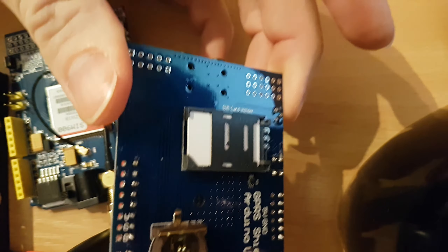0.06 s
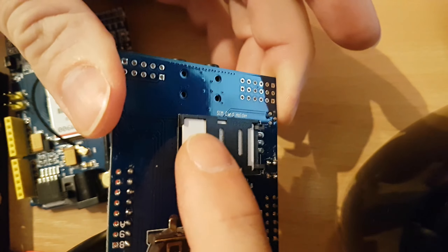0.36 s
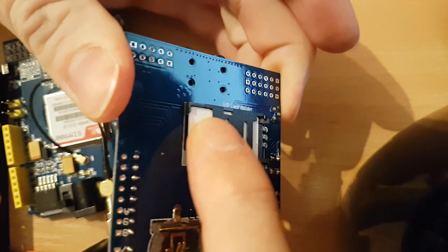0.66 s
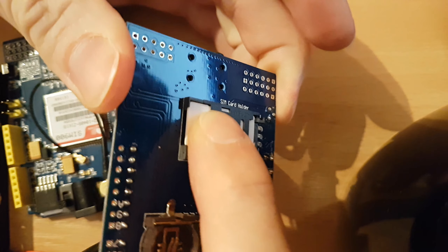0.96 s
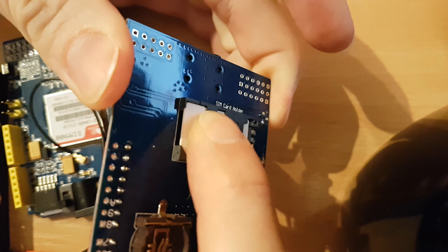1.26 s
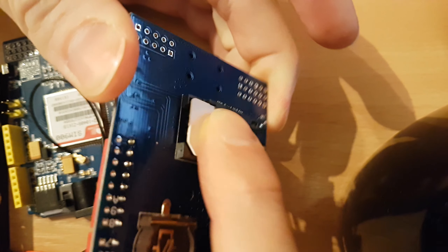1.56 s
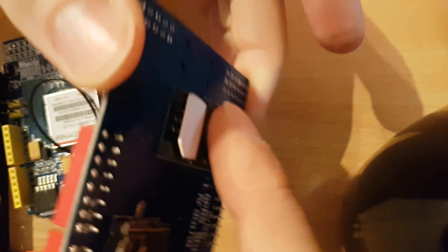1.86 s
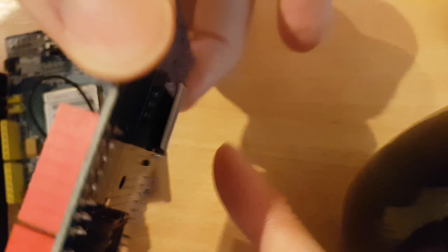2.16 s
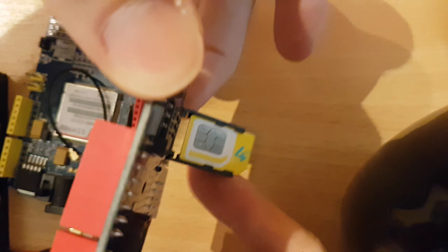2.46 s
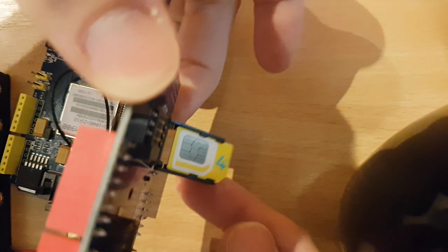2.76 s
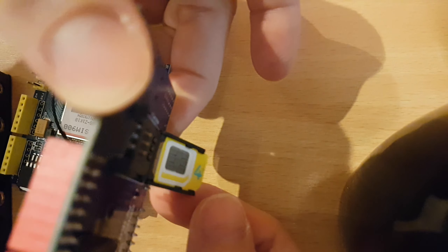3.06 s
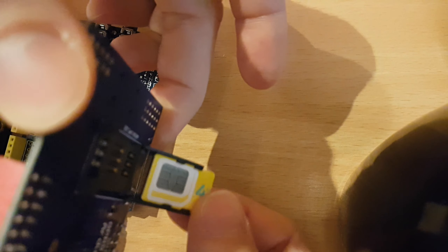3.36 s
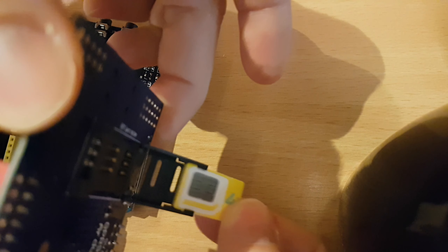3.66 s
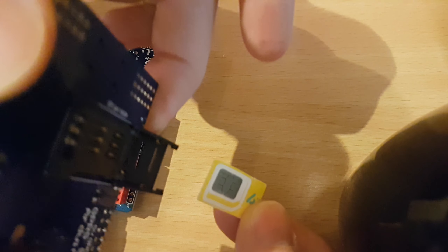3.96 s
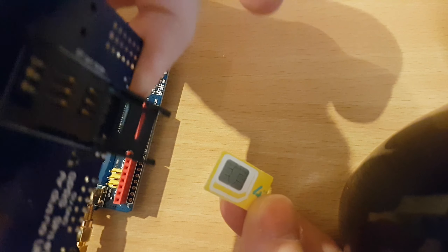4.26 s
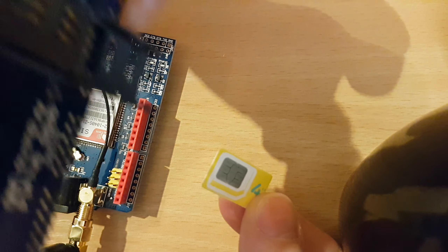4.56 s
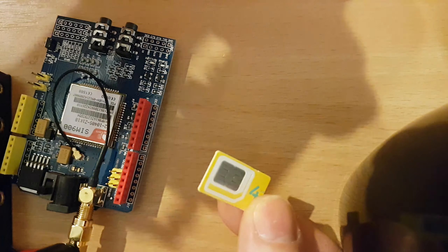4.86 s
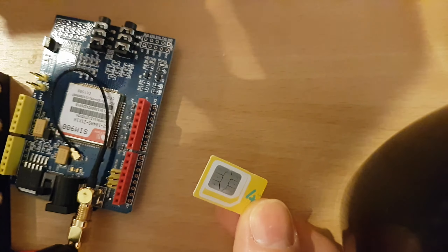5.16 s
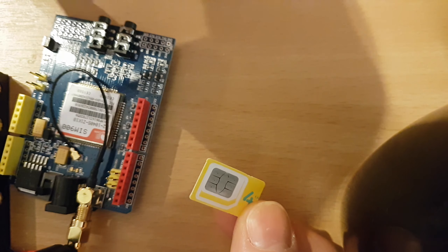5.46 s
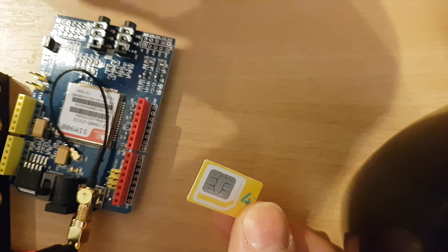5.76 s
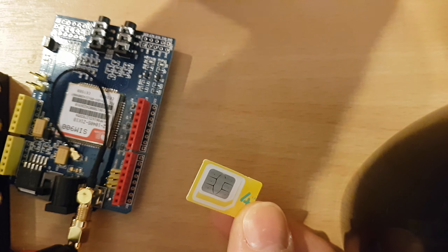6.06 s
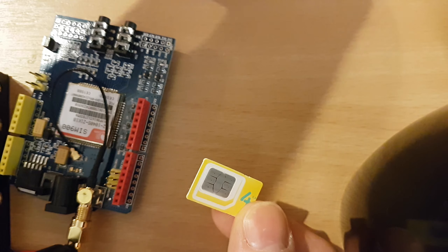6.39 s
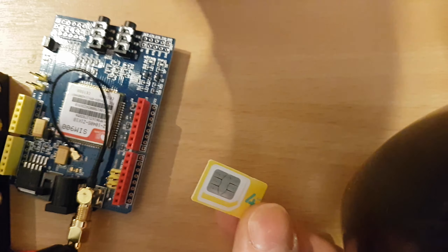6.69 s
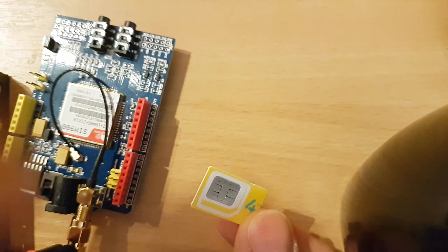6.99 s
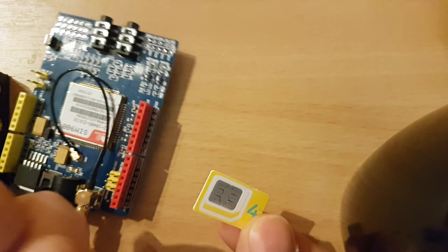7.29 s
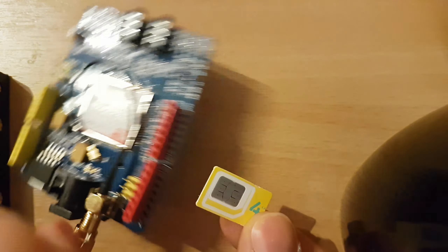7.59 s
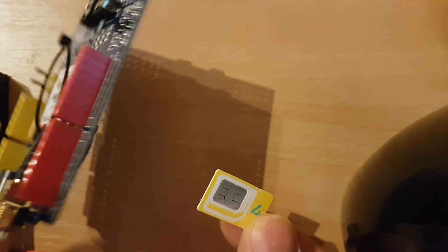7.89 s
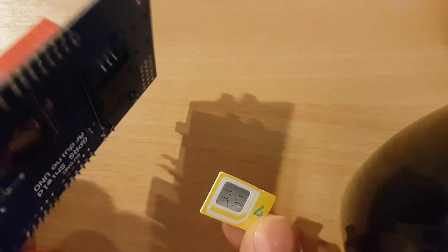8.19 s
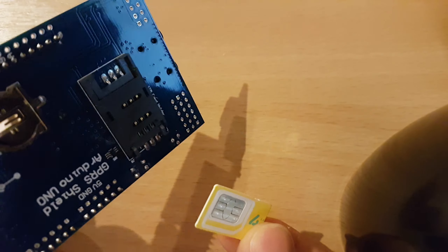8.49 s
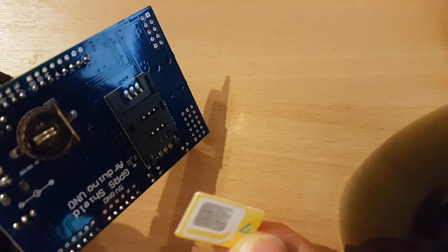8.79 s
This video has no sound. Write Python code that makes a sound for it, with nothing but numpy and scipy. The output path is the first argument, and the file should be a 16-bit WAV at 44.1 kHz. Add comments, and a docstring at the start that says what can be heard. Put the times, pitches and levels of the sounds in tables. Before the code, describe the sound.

A tiny metal latch snaps close by, then a circuit board is set down on wood with knocks and short rubs.

```python
"""Over the soft low drone of a small room, fingers scrape at a circuit board's SIM holder, close on the left.
Its steel latch snaps and rings the plastic frame, the lid swings up, and the card comes out.
The board is put down on a wooden desk: its edge clacks, the top booms, and it rubs along in short shoves.
Then a second board is picked up. The room answers the knocks with a short tail."""
import sys
import numpy as np
from scipy import signal
from scipy.fft import rfft, irfft
from scipy.io import wavfile
from scipy.ndimage import uniform_filter1d

SR = 44100
rng = np.random.default_rng(int(sys.argv[2]) if len(sys.argv) > 2 else 0)


def dump(signal):
    """Clip the signal to [-1, 1] and save it as 16-bit WAV at the path in sys.argv[1]."""
    limited = np.clip(np.atleast_2d(signal).T, -1, 1)
    pcm = np.round(limited * 32767).astype(np.int16)
    wavfile.write(sys.argv[1], SR, pcm)


N = 394240
RING = 16384  # samples in one hit with its decay
TIME, AGE = np.arange(N) / SR, np.arange(RING) / SR
ALL_HZ, RING_HZ = np.fft.rfftfreq(N, 1 / SR) + 1, np.fft.rfftfreq(RING, 1 / SR) + 1

# bright colour of a crack or of fine friction: (frequency [Hz], level [dB])
CRACK_COLOUR = [(200, -14), (800, -9), (1150, -1), (1650, -2), (2100, -6.5), (3800, -2), (4700, -2.5),
                (5500, -1), (6500, -2), (8300, -3), (10100, 0), (11500, -1.5), (14000, -2.5), (16000, -10)]
# knocks on a circuit board: (time [s], level [dB], tilt [dB/octave], rattle t60 [s])
BOARD_KNOCKS = [(0.615, -44.5, -2.5, .3), (0.656, -51.5, -3, 0.11), (2.2136, -38, -0.1, 0.28),
                (2.263, -45.5, 1, 0.47), (2.294, -45, -2, 1), (2.486, -50.5, -3, .3),
                (6.6512, -35, 1, 0.15), (6.672, -45.5, 1, .1), (6.7002, -45, 1, 0.045),
                (6.7506, -46.5, -1.5, 0.048), (7.378, -49, -4.5, 0.49), (7.5017, -39.5, 0.74, 0.02),
                (7.5802, -50.5, -2.5, 0.12)]
# hollow ring of the board on the wood: (frequency [Hz], weight [dB], t60 [s])
HOLLOW_MODES = [(553, -2, .15), (693, -8, 0.13), (813, -2, 0.11), (983, -2, 0.19), (1064, 6.5, 0.21),
                (1285, -8, 0.27), (1530, -8, .15), (1690, 2, 0.19), (1760, -7, .18), (1975, 1, 0.25),
                (2530, -11, .16), (2950, -13, 0.11)]


def undb(db):
    """Decibels to gain."""
    return 10 ** (np.asarray(db) / 20)


def along(points, hz):
    """Read (frequency, value) points on a log-frequency axis."""
    f, v = np.transpose(points)
    return np.interp(np.log(hz), np.log(f), v)


def unit(x):
    """Scale to rms 1."""
    return x / np.sqrt(np.mean(x ** 2))


def blow(x, db):
    """Scale a hit so that its energy, spread over 10 ms, has this level."""
    return x * undb(db) / np.sqrt(np.mean(np.sum(x ** 2, axis=-1)) / (SR / 100))


def add(track, s, x):
    """Mix a sound into a track at time s."""
    i = int(round(s * SR))
    track[..., i:i + x.shape[-1]] += x[..., :N - i]


def stereo_noise(hz, alike_hz):
    """Noise spectra at the two microphones: the same in the bass, unrelated in the treble."""
    mid, side = np.exp(2j * np.pi * rng.random((2, len(hz))))
    alike = 1 / (1 + (hz / alike_hz) ** 3)
    return mid * np.sqrt(1 + alike) + np.array([[1], [-1]]) * side * np.sqrt(1 - alike)


def ring(modes):
    """Decaying sines of a struck part; neighbouring modes start in opposite directions."""
    return sum((-1) ** k * undb(db) / np.sqrt(t60) * np.sin(2 * np.pi * hz * AGE) * undb(-60 * AGE / t60)
               for k, (hz, db, t60) in enumerate(modes))


def burst(colour, tilt_db, t60, alike_hz=800, soft_s=0.00055, chatter_db=0):
    """Many crowded modes, heard as dying noise of the given colour."""
    rise_s = soft_s * (0.15 + max(-tilt_db, 0))  # a duller contact builds more slowly
    envelope = undb(-60 * AGE / max(t60, .001)) * (1 - np.exp(-AGE / rise_s))
    # loose parts lose and regain contact every millisecond or so
    chatter = undb(chatter_db * unit(uniform_filter1d(rng.standard_normal(RING), size=40)))
    noise = rfft(irfft(stereo_noise(RING_HZ, alike_hz)) * envelope * chatter)
    gain = undb(along(colour, RING_HZ) + tilt_db * np.log2(np.maximum(RING_HZ, 200)))
    cepstrum = irfft(np.log(gain))
    fold = 1 + np.sign(RING // 2 - np.arange(RING))  # minimum phase keeps the attack sharp
    return irfft(noise * np.exp(rfft(cepstrum * fold) - cepstrum[0]))


def from_left(x, pan_db):
    """The recorder's body shades the right microphone from a close sound on the left."""
    # depth of the shade: (frequency [Hz], multiple of pan_db [ratio])
    shadow = [(300, 0.8), (800, 0), (2000, 2.2), (4000, 0.9), (9000, 0.9), (14000, 1.25)]
    return irfft(rfft(x) * undb(np.outer([0, -1], pan_db * along(shadow, RING_HZ))))


def early_echoes(x, echo_db, t60):
    """Quick reflections off the hands, the desk and the things on it."""
    echoes = rng.standard_normal((2, RING)) * undb(-60 * AGE / t60) * (1 - np.exp(-AGE / 0.0012))
    echoes = echoes * undb(echo_db) / np.sqrt(np.sum(echoes ** 2) / 2)
    return signal.fftconvolve(x[None], echoes, axes=1)[:, :N]


def room(x, wet_db, treble_db, build_s):
    """Diffuse tail of a small room; the bass lingers longest."""
    # reverb time: (frequency [Hz], t60 [s])
    decay = [(100, 1), (500, 0.22), (3000, 0.28), (8000, 0.2), (16000, 0.2)]
    centres = 125 * 2. ** np.arange(8)
    noise, tail = stereo_noise(RING_HZ, 480), 0
    for hz, band in zip(centres, np.eye(len(centres))):
        share = np.interp(np.log(RING_HZ), np.log(centres), band)
        envelope = undb(-60 * AGE / along(decay, hz) + treble_db * hz / centres[-1])
        tail = tail + irfft(noise * share) * envelope
    tail = tail * (1 - np.exp(-(AGE / build_s) ** 2))
    tail = tail * undb(wet_db) / np.sqrt(np.sum(tail ** 2) / 2)
    return signal.fftconvolve(x[None], tail, axes=1)[:, :N]


def room_tone(level_db=-57.5, balance_db=0.2):
    """Steady air with a few droning low resonances, and the microphones' own hiss."""
    # colour of the noise bed: (frequency [Hz], level [dB])
    bed = [(20, -21), (45, -16.5), (72, -12.5), (95, -5.5), (200, -0.5), (310, -5.5), (380, -12.5),
           (620, -13.5), (1100, -14), (2200, -20.5), (3000, -23), (6000, -35.5), (9000, -40), (12000, -36),
           (15500, -32)]
    # room resonances: (frequency [Hz], width [Hz], boost [dB])
    drone = [(104.4, 23.7, 7.65), (186.6, 31, 9.6), (252, 24, 5.7), (325.5, 26.6, 8.3), (467, 111, 7.6)]
    # stereo width: (frequency [Hz], side minus mid [dB])
    spread = [(60, -19), (110, -11), (200, -15), (380, -7), (700, -2), (1290, 1.5), (2380, 0.5), (4400, 0),
              (8120, 0.5), (15000, 0.5)]
    drone_db = sum(db / (1 + (2 * (ALL_HZ - hz) / width) ** 2) for hz, width, db in drone)
    mid, side = rfft(rng.standard_normal((2, N))) * undb(along(bed, ALL_HZ) + drone_db)
    mid, side = irfft(mid, N), irfft(side * undb(along(spread, ALL_HZ)), N)
    sides = np.array([[1], [-1]])
    return (mid + sides * side) / np.std(mid) * undb(level_db + sides * balance_db / 2)


def holder_slips(loose_from_s=2.2, loose_until_s=7.0, jolt_db=-15, jolt_s=0.033):
    """Cue list of the holder's snaps, dull scrapes and lid jolts, all laid out like the snaps."""
    # snaps: (time [s], crack level [dB], tilt [dB/octave], frame ring against the crack [dB])
    snaps = [(1.378, -43, -1, -17), (1.379, -32, 0.2, -15), (1.6402, -36, 6, -5), (2.359, -50, -5, 1),
             (2.3935, -55.5, 2.5, -6), (3.462, -69, -5.5, 5), (3.9123, -49, 1, 6.5), (5.739, -60, -5, -1),
             (6.252, -49.5, 4, -5), (6.4969, -53, -6.5, -6)]
    # light scrapes: (time [s], level [dB], length [s])
    scrapes = [(0.384, -62, 0.031), (0.592, -63, .03), (1.9276, -65.5, 0.018), (2.268, -56, .03),
               (3.8223, -63, .04), (4.175, -50, 0.064), (4.383, -60, .035), (8.341, -60, 0.035),
               (8.383, -63, 0.014)]
    slips = [(*snap, 0.0046) for snap in snaps]  # last column: length [s]
    slips += [(s, db, -4, -12, length_s) for s, db, length_s in scrapes]
    # knocks on the opened board jolt its loose lid, hard bright ones most
    slips += [(s, db + jolt_db + 3.5 * tilt_db, 1, 0, jolt_s)
              for s, db, tilt_db, _ in BOARD_KNOCKS if loose_from_s < s < loose_until_s]
    return slips


def holder(pan_db=14, firm_snap_db=-32.5):
    """Each slip cracks and rings the plastic frame and, more if firm and bright, the steel latch."""
    # plastic frame: (frequency [Hz], weight [dB], t60 [s])
    frame_modes = [(2376, -10, 0.013), (2750, -10.5, 0.0051), (2910, -15.5, 0.1), (3035, -5.5, 0.017)]
    # tiny steel latch: (frequency [Hz], weight [dB], t60 [s])
    latch_modes = [(5460, 1.5, 0.0083), (6100, -7.5, 0.0019), (10300, -19, 0.0039), (11750, -11, 0.0044),
                   (13220, -1, 0.0061), (13840, -1, .003), (14800, -12, .003)]
    near, send, frame = np.zeros((2, N)), np.zeros(N), ring(frame_modes)
    for s, crack_db, tilt_db, frame_db, slip_s in holder_slips():
        latch = ring([(hz, db + tilt_db * np.log2(hz), t60) for hz, db, t60 in latch_modes])
        latch_db = -3.5 + 2 * tilt_db + 0.78 * (crack_db - firm_snap_db)
        # long slips chatter, quick ones crack cleanly
        crack = burst(CRACK_COLOUR, tilt_db, t60=2 * slip_s, chatter_db=min(200 * slip_s, 5))
        push = 0.17 * rng.standard_normal(RING) * undb(-30 * AGE / max(slip_s, .001))
        push[0] = 1  # one sharp release ahead of the fine chatter
        snap = blow(crack, crack_db)
        for part, db in ((frame, frame_db), (latch, latch_db)):
            snap += blow(signal.fftconvolve(push, part)[:RING], crack_db + db)
        add(near, s, from_left(snap, pan_db))
        add(send, s, snap[0])
    echoes = early_echoes(send, echo_db=-15.5, t60=0.075)
    return near + echoes + room(send, wet_db=-19.5, treble_db=-16, build_s=.005)


def board_knocks(rebound_s=.0075):
    """A stiff board knocks, lands again more dully and rattles out; bright hits ring its pin headers."""
    # colour of the board: (frequency [Hz], level [dB])
    colour = [(60, -25.5), (130, -2.5), (280, 1.5), (370, -8.5), (540, 9), (800, -9.5), (1100, -6),
              (1900, -7.5), (2600, -3.5), (3300, -8), (4000, -10), (4800, -16), (5900, -14.5), (7500, -36),
              (9400, -21.5), (16000, -40)]
    # pin headers: (frequency [Hz], weight [dB], t60 [s])
    header_modes = [(2410, 1, 0.016), (3230, 2, 0.022), (3840, 1, .02), (4180, -9, 0.0083),
                    (5860, -14, .03), (9200, -10, .012)]
    # held close on the left, then lying on the desk: (time [s], leftward pan [dB])
    position = [(2.5, 11), (6, 3.5)]
    near, send, headers = np.zeros((2, N)), np.zeros(N), ring(header_modes)
    for s, db, tilt_db, rattle_t60 in BOARD_KNOCKS:
        pan_db = np.interp(s, *np.transpose(position))
        knock = blow(burst(colour, tilt_db, t60=0.05), db)
        pins = blow(headers, db - 10.5 + 3.5 * tilt_db)
        rebound = blow(burst(colour, tilt_db - 0.95, rattle_t60), db - 3)
        for at, contact in ((s, knock + pins), (s + rebound_s, rebound)):
            add(near, at, from_left(contact, pan_db))
            add(send, at, contact[0])
    return near + room(send, wet_db=-12, treble_db=-15, build_s=0.0068)


def desk_knocks(left_lag_s=0.00029):
    """A hard edge clacks on the wood and rings, and the weight behind it makes the desk top boom."""
    # hits on the desk: (time [s], clack level [dB], tilt [dB/octave], boom level [dB])
    hits = [(0.652, -55, -3, -46), (2.219, -45, 0, -38), (6.0298, -29, 1.5, -48), (6.0348, -33, 1, -44),
            (6.05, -38.5, -1.5, -46), (6.2133, -36.5, -2, -49), (6.324, -36.5, -6, -42),
            (6.391, -40.5, -8.5, -52), (6.415, -41.5, -9.5, -45), (6.496, -41, -6.5, -43),
            (6.6101, -44, -3.5, -36.5), (6.6509, -39, -12.5, -26.5), (6.685, -38.5, -7, -28.5),
            (7.503, -45.5, -6, -46.5)]
    # woody colour of a clack: (frequency [Hz], level [dB])
    colour = [(40, -32), (100, 3), (270, 12), (450, -1.5), (700, 10.5), (850, 2), (1100, -1), (1500, 2.5),
              (2900, -1.5), (3700, -11.5), (5000, -21), (8000, -32), (13000, -31.5), (16000, -42)]
    # desk top: (frequency [Hz], weight [dB], t60 [s])
    top_modes = [(119, -23.5, 0.16), (179, 0.5, 0.24), (218, -7, 0.12), (247.6, -20, 0.26),
                 (302, -28.5, 0.14), (444, -12.5, 0.12)]
    near, send, hollow = np.zeros((2, N)), np.zeros(N), ring(HOLLOW_MODES)
    boom = ring(top_modes) * (1 - np.exp(-AGE / 0.0092))
    for s, db, tilt_db, boom_db in hits:
        clack = blow(burst(colour, tilt_db, t60=0.075, alike_hz=480), db)
        add(near, s, clack + blow(boom, boom_db))
        add(send, s, clack[0])
        # hard contacts wake the hollow ring, which reaches the right microphone first
        rung = blow(hollow, db - 7 + 3.5 * tilt_db)
        add(near[1], s, rung)
        add(near[0], s + left_lag_s, rung)
    send = signal.sosfilt(signal.butter(2, 300, "high", fs=SR, output="sos"), send)
    return near + room(send, wet_db=-8.0, treble_db=-5, build_s=0.007)


def bumps():
    """Soft, deep bumps as a hand or the board meets the desk."""
    # low pulses: (time [s], level [dB], frequency [Hz], half-length [s])
    pulses = [(2.235, -43, 118, 0.019), (6.514, -55, 35, 0.028)]
    return sum(undb(db) * np.sin(2 * np.pi * hz * (TIME - s)) * np.exp(-((TIME - s) / half_s) ** 2)
               for s, db, hz, half_s in pulses)


def lid_ring(swing_s=2.258, level_db=-38):
    """The swing of the lid leaves a metal part ringing."""
    # metal part: (frequency [Hz], weight [dB], t60 [s])
    metal_modes = [(246, 2.5, 0.36), (550, 0, 1), (2430, -21, .39), (3480, 1.5, 0.45), (4662, -17, 0.6),
                   (9087, -17, 0.85)]
    attack, fade = 1 - np.exp(-AGE / 0.006), np.minimum(1, 10 * (1 - AGE / AGE[-1]))
    metal = blow(ring(metal_modes) * attack * fade, level_db)
    near = np.zeros((2, N))
    add(near, swing_s, from_left(metal, pan_db=15))
    return near


def board_slide(swell_db_per_s=265, fade_db_per_s=300, relative_width=0.27):
    """Uneven friction on the wood rings a resonance that sinks as the board comes to rest."""
    # shoves: (peak time [s], level [dB], resonance [Hz])
    shoves = [(6.2, -46, 960), (6.326, -46.5, 620), (6.42, -48, 525)]
    # scratch of the wood grain: (frequency [Hz], level [dB])
    grain = [(200, -4), (1000, -5), (1800, -7.5), (2500, -5.5), (3600, -11), (5000, -19), (16000, -38)]
    s, db, hz = np.transpose(shoves)
    force = sum(undb(peak_db - np.maximum(swell_db_per_s * (at - TIME), fade_db_per_s * (TIME - at)))
                for at, peak_db in zip(s, db))
    grip = undb(unit(uniform_filter1d(rng.standard_normal(N), size=260)))  # wavers by 1 dB rms
    band = irfft(stereo_noise(ALL_HZ, 280) / (1 + (ALL_HZ / (relative_width * np.mean(hz))) ** 2), N)
    phase = 2 * np.pi * np.cumsum(np.interp(TIME, s, hz)) / SR
    body = band * np.cos(phase + np.array([[1], [0]]))
    scratch = irfft(stereo_noise(ALL_HZ, 600) * undb(along(grain, ALL_HZ)), N)
    fine = irfft(stereo_noise(ALL_HZ, 600) * undb(along(CRACK_COLOUR, ALL_HZ)), N)
    rub = force * grip * (unit(body) + undb(-9) * unit(scratch) + undb(-23) * unit(fine))
    hollow = signal.fftconvolve(rub, ring(HOLLOW_MODES)[None], axes=1)[:, :N]
    return rub + undb(-5) * np.std(rub) * unit(hollow)


def scene():
    """All handling sounds over the quiet room."""
    return holder() + board_knocks() + desk_knocks() + bumps() + lid_ring() + board_slide() + room_tone()


def record(dry):
    """The recorder cuts the top steeply at 15.9 kHz."""
    return signal.sosfilt(signal.ellip(10, .2, 70, 15900, fs=SR, output="sos"), dry)


dry = scene()
out = record(dry)
dump(out)
```